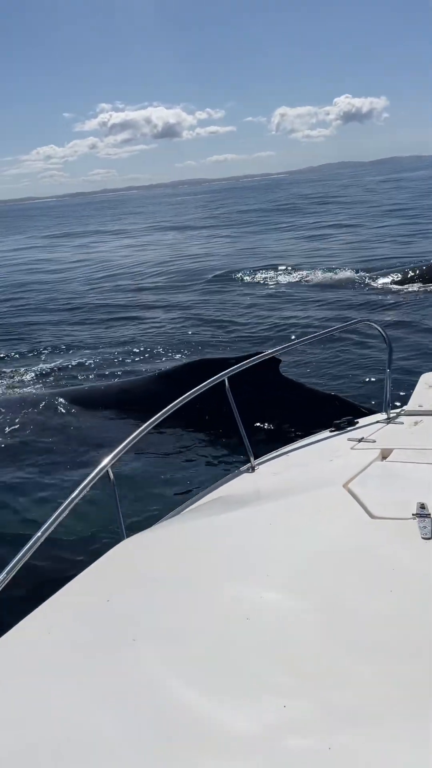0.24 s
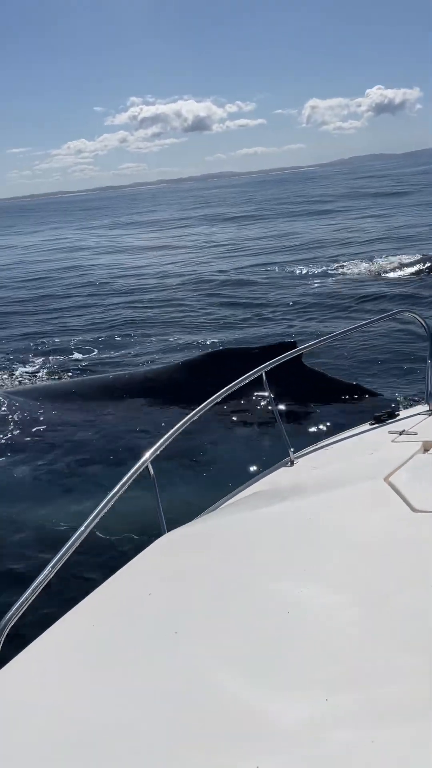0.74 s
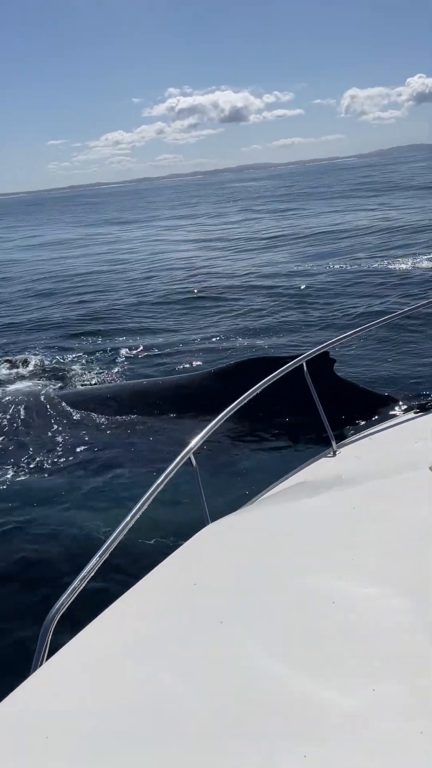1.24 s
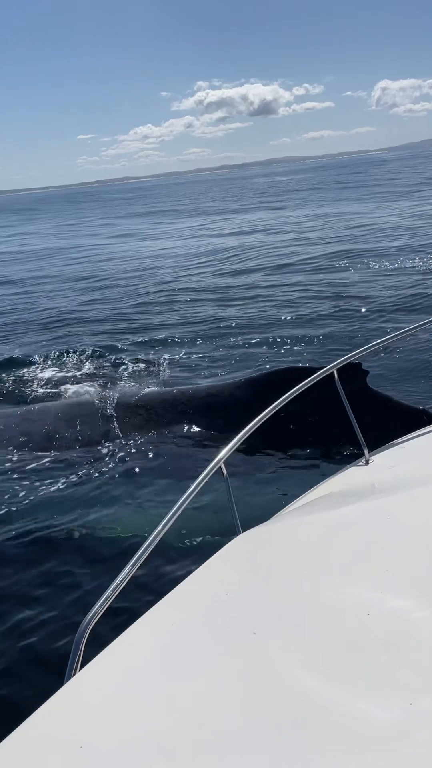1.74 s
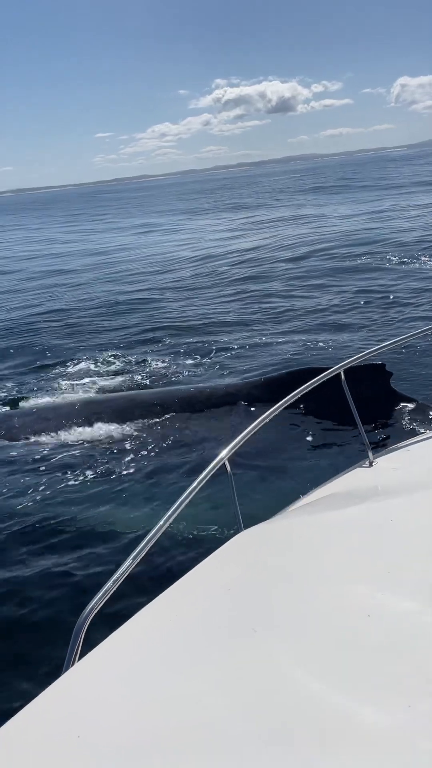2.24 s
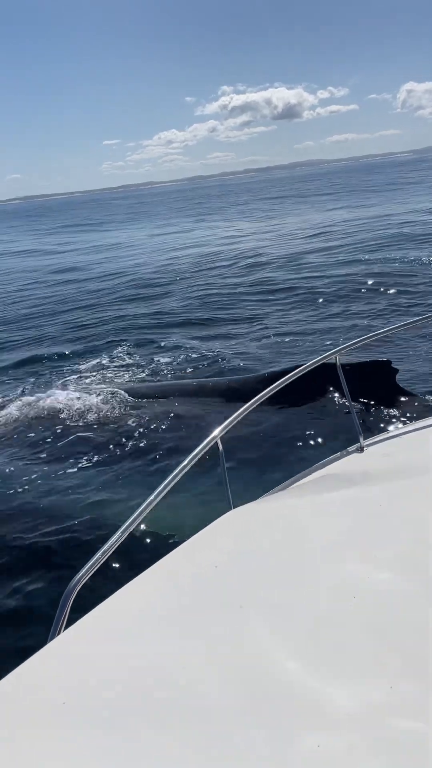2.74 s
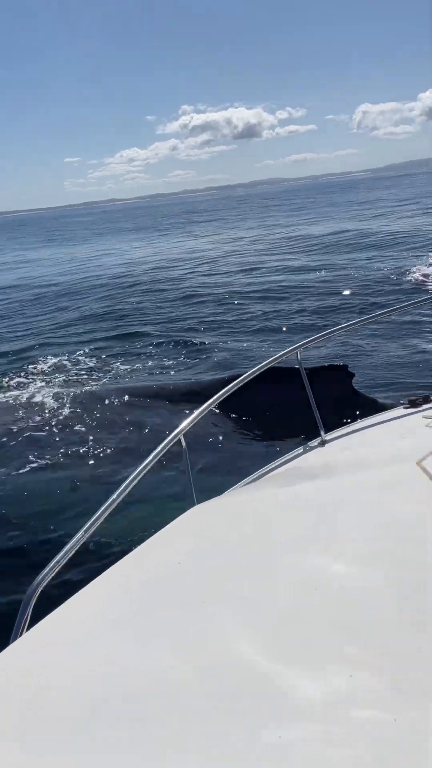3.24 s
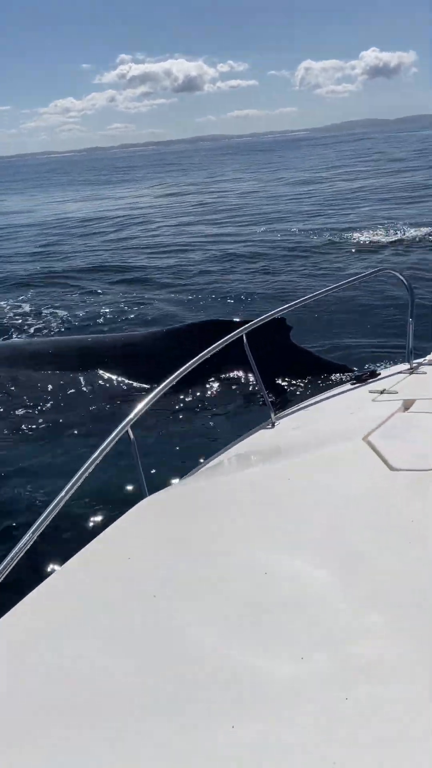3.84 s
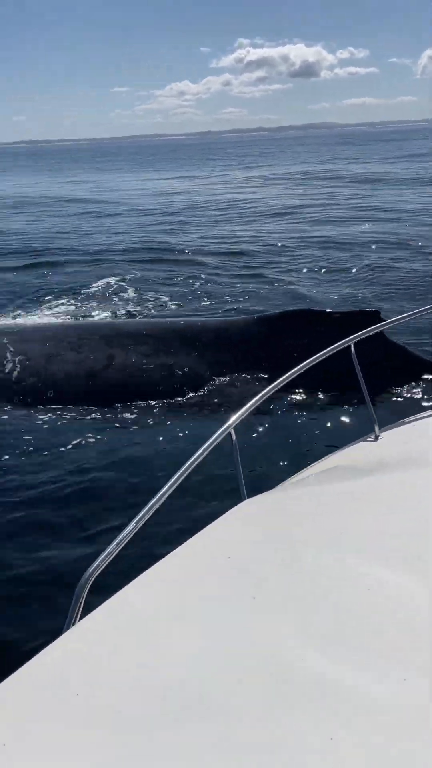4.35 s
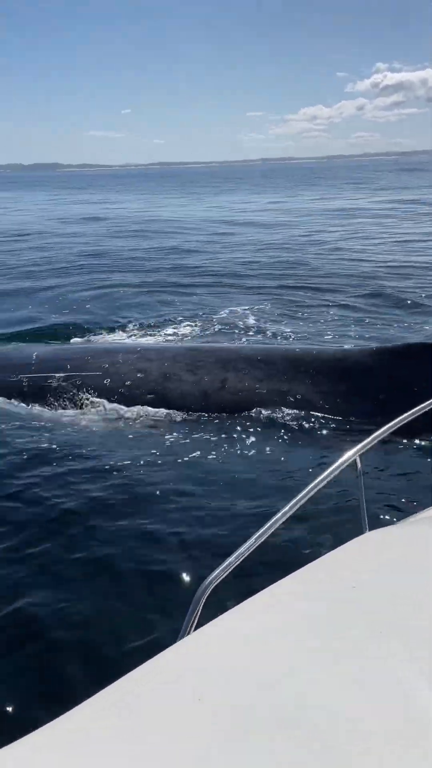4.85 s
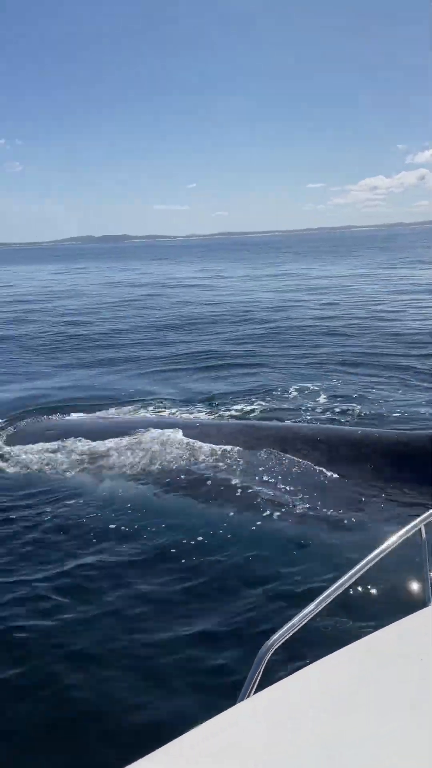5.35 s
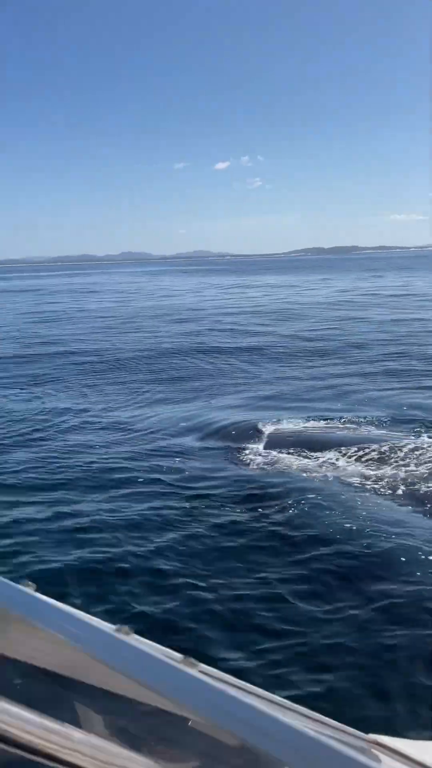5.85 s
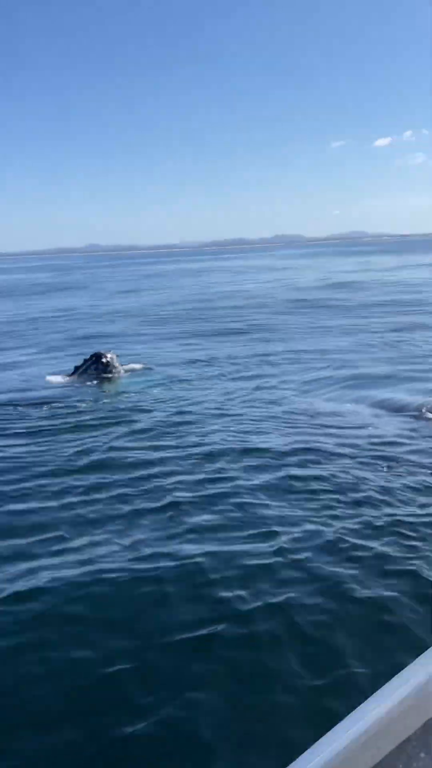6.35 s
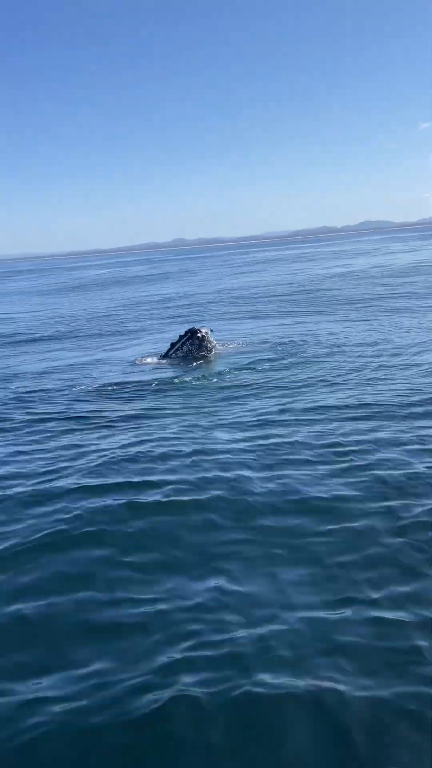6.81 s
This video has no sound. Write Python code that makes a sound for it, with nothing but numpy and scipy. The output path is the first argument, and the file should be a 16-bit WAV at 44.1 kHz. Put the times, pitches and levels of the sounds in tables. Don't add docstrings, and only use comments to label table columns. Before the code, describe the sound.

Churning seawater hisses and gurgles against a boat, with a short whale puff, then stronger airy blasts, over low buffeting wind.

```python
import sys
import numpy as np
from scipy import signal
from scipy.fft import rfft, irfft
from scipy.io import wavfile
from scipy.ndimage import uniform_filter1d

SR = 44100
rng = np.random.default_rng(int(sys.argv[2]) if len(sys.argv) > 2 else 0)


def waveform_to_disk(signal):
    frames = np.transpose(np.atleast_2d(signal))
    scaled = np.clip(frames, -1, 1) * 32767
    samples = np.round(scaled).astype(np.int16)
    wavfile.write(sys.argv[1], SR, samples)


def gain_from_decibels(decibels):
    exponent = np.asarray(decibels, float) / 20
    return 10 ** exponent


N = 312221
QUARTER = np.array([[0], [.25]])


def evened(x):
    return x / np.sqrt(np.mean(x ** 2) + 1e-20)


def curve(t, points):
    return np.interp(t, *np.transpose(points))


def colour(x, points):
    hz, db = np.transpose(points)
    f = np.fft.rfftfreq(x.shape[-1], 1 / SR)
    gain = gain_from_decibels(np.interp(np.log(f + 1), np.log(hz), db, left=-90, right=-90))
    return evened(irfft(rfft(x) * gain, x.shape[-1]))


def lumps(top_hz):
    b, a = signal.butter(2, top_hz, fs=SR)
    return evened(signal.lfilter(b, a, rng.standard_normal(N)))


def white(count=N):
    return rng.standard_normal((2, count))


def add(mix, s, sound):
    part = mix[:, round(s * SR):][:, :sound.shape[-1]]
    part += sound[..., :part.shape[-1]]


def grains(per_s, spread_db, low_hz, high_hz, cycles):
    out = np.zeros((2, N))
    for hz in np.geomspace(low_hz, high_hz, num=12):
        u = np.linspace(0, 1, int(cycles * SR / hz) + 4)
        tone = np.sin(2 * np.pi * cycles * u * (1 + 0.15 * u))
        shape = tone * u ** 0.73 * np.exp(-3.5 * u)
        hit = rng.random((2, N)) * SR / per_s * 12
        chance = np.where(hit < 1, np.maximum(hit, .008), np.inf)
        size = chance ** (-spread_db / 20 * np.log(10))
        out += signal.oaconvolve(size, shape[None] / np.linalg.norm(shape), axes=1)[:, :N]
    return evened(out)


# (time [s], churn [dB])
CHURN = [(0, -45.5), (.13, -47), (.55, -46), (.75, -51.5), (.99, -58), (1.3, -52), (1.77, -54),
         (2.1, -45.5), (2.7, -52), (3.41, -54), (3.67, -58.5), (4.48, -59.5), (5.3, -52), (5.78, -52),
         (6.15, -51.5), (6.56, -57.5), (6.92, -50.5), (7.08, -53)]
# (start [s], rise [s], hold [s], sag [dB/s], rush level [dB])
BLOWS = [
    (1.807, 0.19, 0.17, 67, -63),
    (1.912, 0.019, 0.039, 60, -52.5),
    (3.671, 0.093, 0.017, 81, -43.5),
    (3.797, 0.16, 0.19, 37, -49.5),
    (4.516, 0.03, 0.084, 31, -51.5),
    (4.53, 0.2, 0.22, 35.5, -44),
    (4.7, .05, 0.21, 92, -48),
    (5.098, 0.046, 0.08, 65, -46.5),
    (2.12, 0.081, 0.098, 53, -51),
]


def strength(still_db, follows, blow_db, sag_share):
    t = np.arange(N) / SR
    power = gain_from_decibels(still_db + follows * (curve(t, CHURN) + 52)) ** 2
    for start, rise, hold, sag_db, db in BLOWS:
        early = np.clip(1 - (t - start) / rise, 0, None)
        late = np.clip(t - start - rise - hold, 0, None)
        power = power + gain_from_decibels(db + blow_db - 24 * early - sag_share * sag_db * late) ** 2
    return np.sqrt(power)


# (frequency [Hz], level [dB per Hz])
WASH_SPECTRUM = [(120, 3.5), (250, -6.5), (450, -0.5), (800, -1), (1200, -2.5), (2000, -68), (4000, -57)]
# (time [s], level [dB])
SLOSH_LEVEL = [(0, 3.5), (.15, -1), (.5, -0.5), (1.0, -1.5), (1.35, 5), (1.7, 0), (2.5, 1), (2.78, -1.5),
               (3.1, 1.5), (3.55, 2.5), (3.7, 1), (4.1, 2.5), (4.4, 0), (4.65, -0.5), (4.9, -0.5), (5.75, 1.5),
               (6.4, -0.5), (7.08, -0.5)]


def wash(surge):
    bubbles = grains(600, 2.0, 303.4, 1488, 5.07)
    slosh = colour(white() + 0.5 * bubbles, WASH_SPECTRUM)
    slosh *= gain_from_decibels(0.5 + 1.17 * surge + curve(np.arange(N) / SR, SLOSH_LEVEL))
    return slosh * strength(-49.5, follows=0.66, blow_db=-3, sag_share=0.84)


# (frequency [Hz], level [dB per Hz])
RUSH_SPECTRUM = [(700, 1), (1300, 3.5), (2200, 6), (3200, -0.5), (4300, -4.5), (6000, -17.5)]


def rush(surge, foam):
    broken = colour(white() + .5 * foam, RUSH_SPECTRUM) * gain_from_decibels(1.5 + 1.2 * surge)
    return broken * strength(-52, follows=0.86, blow_db=0, sag_share=1)


# (frequency [Hz], level [dB per Hz])
FIZZ_SPECTRUM = [(3000, -5.5), (4500, 0), (5500, -3), (7000, -6.5), (8200, -6), (11000, -29)]


def fizz(surge, foam):
    bursting = colour(white() + 0.43 * foam, FIZZ_SPECTRUM) * gain_from_decibels(3.5 + 1.63 * surge)
    return bursting * strength(-61.5, follows=0.74, blow_db=-5.5, sag_share=1)


# (frequency [Hz], level [dB per Hz])
SPRAY_SPECTRUM = [(6000, -25), (8500, 0), (10000, -1), (11500, -4), (13000, -6), (16000, -11)]


def spray(surge):
    mist = colour(white(), SPRAY_SPECTRUM) * gain_from_decibels(5.0 + 1.0 * surge + 1.6 * lumps(150))
    return mist * strength(-69.5, follows=0.56, blow_db=-18.5, sag_share=0.54)


# (time [s], spacing of the comb peaks [Hz], echo strength [0-1])
DECK = [(0, 1680, 0.28), (.95, 1910, 0.52), (1.05, 1730, 0.43), (1.5, 1740, 0.33), (1.65, 1960, 0.38),
        (2.05, 2030, 0.5), (2.3, 2350, 0.7), (3.0, 2510, 0.33), (3.1, 1860, 0.3), (3.68, 1750, 0.25),
        (3.72, 1890, .95), (4.25, 1900, .88), (4.42, 2200, .1), (4.55, 2480, .86), (4.75, 2610, .94),
        (5.05, 2690, .87), (5.3, 2760, .62), (5.55, 3250, 0), (7.08, 4040, 0.35)]


def deck_echo(x):
    size, hop = 256, 64
    hz, frame_s, z = signal.stft(x, SR, nperseg=size, noverlap=size - hop)
    patches = uniform_filter1d(rng.standard_normal(z.shape[1:]), 4, 0)
    patches = evened(uniform_filter1d(patches, 40, 1))
    s, spacing_hz, echo = np.transpose(DECK)
    echo = np.clip(np.interp(frame_s, s, echo), 0, .95)
    cycles = hz[:, None] / np.interp(frame_s, s, spacing_hz)
    echo = echo * np.exp(-((0.13 + .5 * (1 - echo)) * cycles) ** 2)
    turn = np.exp(-2j * np.pi * (cycles - .4 * np.exp(-cycles)))
    comb = abs(1 + echo * turn) / np.sqrt(1 + echo ** 2)
    return signal.istft(z * comb * gain_from_decibels(1.82 * patches), SR, nperseg=size, noverlap=size - hop)[1][:, :N]


def water():
    surge = lumps(10.5)
    foam = grains(3500, 3.95, 1178, 9210, 6)
    return deck_echo(wash(surge) + rush(surge, foam) + fizz(surge, foam) + spray(surge))


# (time [s], level change [dB], width [s])
WIND_DIPS = [(.17, -1, 0.089), (.65, -3, 0.049), (1.32, -2.5, 0.068), (1.62, -7, 0.028), (2.1, 1.5, .05),
             (2.34, 0.5, 0.015), (2.75, -0.5, 0.066), (3.19, -8, 0.059), (3.67, -3, 0.067),
             (4.17, -3.5, 0.086), (4.05, -2.5, 0.044), (5.0, -2.5, 0.041), (5.2, -4, 0.031), (5.52, -2, 0.051),
             (5.92, -12, 0.022), (6.3, -13, 0.017)]


def lull():
    t = np.arange(N) / SR
    dip_db = sum(db * np.exp(-((t - s) / width) ** 2) for s, db, width in WIND_DIPS)
    dips = [1 - .78 * np.exp(-((t - s - .015) / .022) ** 2) for s, *_ in THUMPS]
    return gain_from_decibels(dip_db) * np.prod(dips, axis=0)


# (frequency [Hz], level [dB per Hz])
RUMBLE_SPECTRUM = [(30, -26), (50, -2), (70, 2), (100, -2.5), (140, -8), (250, -45)]
FLUTTER_SPECTRUM = [(70, -10), (140, 3), (200, 3), (300, 0), (500, -37), (900, -7)]
HEAVE_SPECTRUM = [(20, -8), (35, -28), (48, 21), (60, 10), (90, -25)]
# (time [s], heave above rumble [dB])
FACING = [(0, -6), (.5, -5), (.75, 9.5), (.99, -18), (1.15, 4), (1.6, 2), (1.78, -13), (2.27, 8.5),
          (2.52, -6), (2.8, -8), (3.04, -15), (5.98, -20), (6.15, 8), (6.35, -14), (6.62, 0), (6.82, -22),
          (7.08, 7)]
# (peak time [s], rumble level [dB], rise [s], fall [s], flutter above rumble [dB])
GUSTS = [(.39, -31.5, 0.11, 0.092, 1), (.52, -33.5, 0.35, 0.053, -1.5), (.71, -29.5, 0.033, 0.084, -6),
         (.99, -25, 0.26, 0.14, -11), (1.2, -40.5, 0.061, 1.4, -12), (1.48, -48, 0.1, 0.25, -4),
         (1.602, -34.5, 0.26, 0.52, -7), (1.95, -44, 0.4, 2.6, -9), (2.42, -42, 1, 0.082, 2.5),
         (2.51, -41.5, 0.6, .2, -7), (2.6, -27.5, 0.062, 0.028, 3.5), (2.66, -36, .1, 0.31, -28),
         (3.04, -37, 0.38, 0.13, -11), (3.5, -44.5, 0.29, 0.63, -0.5), (3.49, -37.5, 0.06, 0.56, -7),
         (3.77, -31, 0.047, 0.048, -16), (3.83, -41.5, 0.17, 0.048, 5), (4.5, -43.5, 0.2, 1.1, -0.5),
         (4.85, -28.5, 0.47, 0.14, -10), (5.47, -49.5, 0.95, 0.095, 9.5), (5.99, -30.5, 0.2, 0.1, -5),
         (6.27, -55.5, 0.47, 0.11, 13.5), (6.33, -35.5, 0.026, 0.62, -2), (6.62, -50, 0.74, 2, 3.5)]


def wind():
    t = np.arange(N) / SR
    eddies = lumps(16.0)
    rumble = evened(colour(white(), RUMBLE_SPECTRUM) * gain_from_decibels(2.0 * eddies))
    flutter = evened(colour(white(), FLUTTER_SPECTRUM) * gain_from_decibels(1.93 * eddies + 2.8 * lumps(26.3)))
    rumble += gain_from_decibels(curve(t, FACING) - 2.5) * colour(white(), HEAVE_SPECTRUM)
    low, high = gain_from_decibels(-54) ** 2, gain_from_decibels(-52) ** 2
    for s, db, rise, fall, flutter_db in GUSTS:
        gust = gain_from_decibels(db - 20 * np.maximum((s - t) / rise, (t - s) / fall)) ** 2
        low = low + gust
        high = high + gust * gain_from_decibels(flutter_db) ** 2
    return gain_from_decibels(0.83) * (np.sqrt(low) * rumble + np.sqrt(high) * flutter)


# (time [s], peak level [dB], pitch [Hz], length [cycles])
DROPS = [(0.0563, -39, 1920, 32), (0.0933, -24, 1920, 9.6), (0.4062, -26, 2260, 12),
         (0.5066, -14.5, 1910, 7), (0.6534, -44, 2110, 180), (0.7666, -27, 2660, 17),
         (1.1129, -27, 2020, 13), (1.3547, -32, 1860, 28), (1.9255, -21, 1960, 11), (1.971, -26, 2340, 28),
         (2, -14, 4070, 21), (2.151, -25, 2040, 25), (2.252, -29, 1780, 24), (2.313, -22, 2110, 14),
         (2.397, -27, 1940, 15), (2.5745, -30, 2230, 15), (2.8584, -41, 2200, 11), (2.9354, -31, 2160, 25),
         (3.1622, -28, 2370, 20), (3.3972, -23, 1870, 11), (3.493, -30, 1600, 41), (3.7693, -23, 2350, 24),
         (3.8003, -22.5, 2290, 23), (3.8742, -18, 2210, 12), (3.9751, -25, 2020, 27),
         (4.0961, -26.5, 2110, 16), (4.1408, -23, 2200, 28), (4.438, -25, 3080, 17),
         (5.0894, -21.5, 2390, 32), (5.1756, -28, 2560, 31), (5.8234, -18.5, 2350, 19),
         (5.84, -28, 2470, 32), (6.019, -33, 2700, 33), (6.0656, -27, 1896, 63), (6.086, -37, 2070, 22),
         (6.1135, -27, 1860, 26), (6.42, -37, 2400, 37), (6.462, -31, 4230, 74), (6.49, -44, 4170, 50),
         (4.11, -25, 2620, 16), (5.943, -30, 2240, 8.3), (6.303, -29, 1490, 9.9), (2.48, -29, 5380, 37),
         (5.841, -27, 1900, 17), (5.092, -20, 5570, 22)]
PLOPS = [(0.13, -28, 666, 6.3), (0.211, -18.5, 755, 5.2), (0.32, -22, 586, 12), (0.505, -33, 590, 19),
         (0.666, -33, 730, 10), (0.861, -27, 757, 8.3), (1.165, -25, 476, 5.6), (1.27, -39, 334, 32),
         (1.454, -26, 694, 9.2), (1.926, -12, 493, 5.1), (1.997, -26, 860, 8.2), (2.127, -27, 903, 19),
         (2.276, -28, 932, 35), (2.389, -21.5, 568, 9.5), (2.473, -15.5, 746, 8.8), (2.661, -27.5, 804, 22),
         (2.992, -32, 570, 16), (3.386, -26, 1053, 16), (3.549, -39, 496, 17), (3.601, -32, 511, 33),
         (3.678, -33, 1236, 35), (3.7, -29, 1250, 48), (3.703, -30, 600, 11), (3.763, -23, 800, 22),
         (3.824, -25, 745, 13), (3.926, -32, 850, 8.9), (4.047, -22, 870, 7.4), (4.521, -22.5, 1140, 6),
         (4.534, -29.5, 1520, 7.3), (4.538, -23.5, 810, 7.3), (4.934, -19, 785, 6.9), (5.059, -25, 970, 10),
         (5.225, -22, 987, 14), (5.276, -21.5, 977, 14), (5.413, -23, 870, 8.7), (5.435, -18.5, 627, 8),
         (5.817, -29.5, 995, 46), (6.021, -21.5, 636, 6.2), (6.07, -28, 1320, 19), (6.072, -15, 470, 2.9),
         (6.169, -36, 665, 8), (6.317, -30.5, 910, 18), (6.722, -30, 1280, 10.3), (0.745, -26, 640, 13),
         (2.29, -20, 1076, 13), (3.71, -24, 1540, 11), (4.165, -29, 537, 13), (4.23, -29, 844, 10),
         (5.828, -28, 750, 8)]


def bubble(db, hz, cycles):
    u = np.linspace(0, 1, int(cycles * SR / hz) + 4)
    turns = cycles * u * (0.963 + 0.06 * u) + QUARTER
    band = [(hz * 0.52, -20), (hz * 0.7, -3), (hz * 1.15, 0), (hz * 1.65, -20)]
    splash = colour(white(len(u)), band)
    rise = 1 - np.exp(-u * cycles / hz / 0.0017)
    decay = np.exp(-2.4 * u) * (1 - u ** 4)
    return gain_from_decibels(db - 5.0) * rise * decay * (np.sin(2 * np.pi * turns) + 0.42 * splash)


# (time [s], peak level [dB], hull ring [Hz], t60 [s])
SLAPS = [(0.082, -39, 315, 0.11), (0.626, -35.5, 247, 0.15), (1.163, -39.5, 160, 0.2),
         (1.455, -28, 254, 0.17), (1.488, -30, 198.4, 0.15), (1.651, -43, 240, 0.088),
         (1.711, -38, 255, 0.14), (1.93, -23.5, 184, 0.16), (1.952, -30.5, 244, 0.18),
         (2.925, -39.5, 282, 0.23), (3.338, -30, 150, 0.044), (3.408, -24.5, 193.6, 0.22),
         (3.702, -33, 512, 0.08), (3.763, -42, 364, 0.89), (3.805, -35, 237, 0.19), (3.84, -29, 325, 0.1),
         (3.887, -29, 330, 0.094), (4.41, -26, 198, 0.088), (4.765, -34, 166, 0.15),
         (4.88, -32, 266, 0.095), (4.893, -27, 365, 0.066), (4.93, -32, 295, 0.11), (5.368, -38, 237, .12),
         (5.634, -43, 224, 0.084), (5.74, -37.5, 416, 0.14), (5.883, -34.5, 186, 0.11),
         (6.015, -28.5, 210, 0.19), (6.03, -27.5, 295, 0.11), (6.095, -28, 275, 0.054),
         (6.168, -27, 386, 0.16), (6.184, -26, 404, 0.1), (6.237, -32.5, 265, 0.19), (6.345, -34, 161, .05),
         (6.27, -36, 610, 0.08), (6.634, -27, 282, 0.054), (6.821, -38.5, 249.6, 0.24),
         (0.919, -35, 270, 0.084), (1.749, -44, 340, 0.23), (3.93, -42, 396, 0.076), (6.05, -31, 305, 0.12),
         (6.21, -31.5, 450, 0.069), (6.255, -35, 482, 0.08), (6.285, -37, 350, 0.06)]


def slap(db, hz, t60):
    t = np.arange(int(.3 * SR)) / SR
    ring = np.sin(2 * np.pi * (hz * t + QUARTER)) * gain_from_decibels(-60 * t / t60)
    body = [(hz * 0.5, -25), (hz * 0.25, -3), (hz * 1.28, 0), (hz * 1.26, -4), (hz * 3.8, -24)]
    rough = colour(white(len(t)), body) * gain_from_decibels(-32 * t / t60)
    crack = colour(white(len(t)), [(250, -10), (600, -3), (1500, -7.5), (4000, -22)])
    crack *= np.exp(-t / 0.004) * np.minimum(t / 0.0018, 1)
    rise = 1 - np.exp(-t / .003)
    return gain_from_decibels(db + 2.5) * (0.17 * crack + rise * (ring + 0.46 * rough))


# (time [s], peak level [dB], final pitch [Hz], t60 [s])
THUMPS = [(0.335, -12.5, 73, 0.034), (0.385, -15.5, 69, 0.067), (0.429, -18, 76, 0.056),
          (0.492, -22, 97, 0.11), (0.702, -30.5, 69.4, 0.2), (0.889, -15.5, 69, 0.088),
          (0.982, -11.5, 76.6, 0.1), (1.117, -13.5, 58.4, 0.071), (1.473, -14.5, 69, 0.092),
          (1.57, -18, 67.5, 0.16), (1.933, -16, 65.4, 0.059), (2.199, -26, 54.7, 0.3),
          (2.503, -21, 86.4, 0.088), (2.546, -18.5, 82, 0.1), (2.585, 2.5, 50.6, 0.022),
          (4.319, -25, 83, 0.11), (4.498, -27, 103.4, 0.17), (4.593, -19, 82, 0.07),
          (4.647, -12, 97.5, 0.053), (4.687, -16.5, 113, 0.068), (4.818, -7, 107, 0.043),
          (4.834, -13, 85, 0.055), (5.962, -9, 107, 0.042), (0.751, -25.5, 70, 0.13), (0.82, -26, 62, 0.12),
          (1.04, -21.5, 60, 0.15), (3.495, -23, 110, 0.057), (3.755, -22, 98, 0.06)]


def thump(db, hz, t60):
    t = np.arange(int(.15 * SR)) / SR
    turns = hz * (t + 0.0066 * (1 - np.exp(-t / 0.0021)))
    start = rng.normal(-.5, .2, (2, 1)) - 4 * QUARTER
    envelope = gain_from_decibels(db + 1.0 - 60 * t / t60) * (1 - np.exp(-t / 0.0055))
    return envelope * -np.sin(2 * np.pi * turns + start)


# (time [s], peak level [dB], treble share [dB])
SPITS = [(0.505, -37, -24), (1.0345, -47, -7), (1.357, -43, -24), (1.998, -37.5, -15), (3.3962, -46, -55),
         (4.3205, -46, -30), (4.4035, -48, -3), (4.543, -50, -20), (4.9836, -39, -22), (5.081, -44, -16),
         (5.2, -41, -22), (5.294, -42, -24), (5.8244, -45, -24)]


def spit(db, treble_db):
    t = np.arange(2048) / SR
    rise_s = .002
    burst = colour(white(2048), [(1500, -36), (4000, -2.0), (11000, treble_db), (15500, treble_db - 8)])
    return gain_from_decibels(db + 1.5) * burst * (t / rise_s) ** 2 * np.exp(2 - 2 * t / rise_s)


def scene():
    mix = water() + lull() * wind()
    events = ((bubble, DROPS), (slap, SLAPS), (bubble, PLOPS), (thump, THUMPS), (spit, SPITS))
    for source, table in events:
        for s, *row in table:
            add(mix, s, source(*row))
    return mix


def roll_off(x):
    return signal.sosfilt(signal.butter(12, 15780, fs=SR, output="sos"), x)


# (frequency [Hz], coherence [0-1])
LIKENESS = [(60, 0.77), (130, 0.26), (280, 0.47), (700, 0.77), (1100, 0.56), (2000, 0.66), (4500, 0.44),
            (5200, 1.5), (8000, .88)]
# (frequency [Hz], lead [rad])
LEAD = [(130, 0), (950, 1.15), (1800, .2), (4100, 1.7), (5250, 6.15), (7700, 9.42), (11000, 12.57),
        (14100, 15.7), (15000, 16.1), (15800, 16.62)]
# (frequency [Hz], level difference [dB])
BALANCE = [(60, 0.3), (280, 0.4), (700, 2.5), (1100, 4.5), (1800, 2), (4000, 1), (4600, -1.5), (5100, 0)]


def record(dry):
    hz = np.fft.rfftfreq(N, 1 / SR)
    same = np.clip(curve(hz, LIKENESS), 0, 1)
    tilt = gain_from_decibels(curve(hz, BALANCE) / 2)
    left, twin = rfft(dry)
    right = same * np.exp(-1j * curve(hz, LEAD)) * left + np.sqrt(1 - same ** 2) * twin
    ports = irfft(np.array([left * tilt, right / tilt]), N)
    ports = signal.lfilter(*signal.butter(2, 35, 'high', fs=SR), gain_from_decibels(-0.5) * ports)
    return roll_off(ports)


dry = scene()
out = record(dry)
waveform_to_disk(out)
```